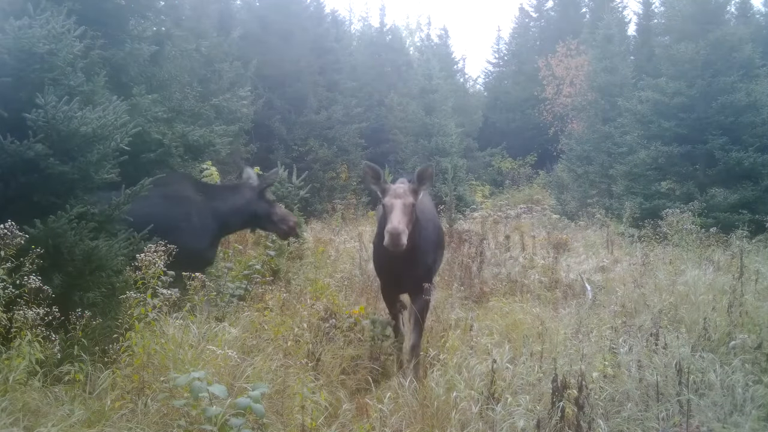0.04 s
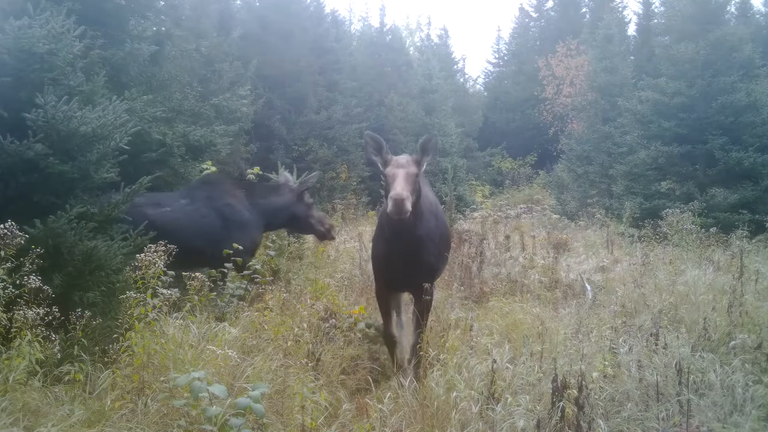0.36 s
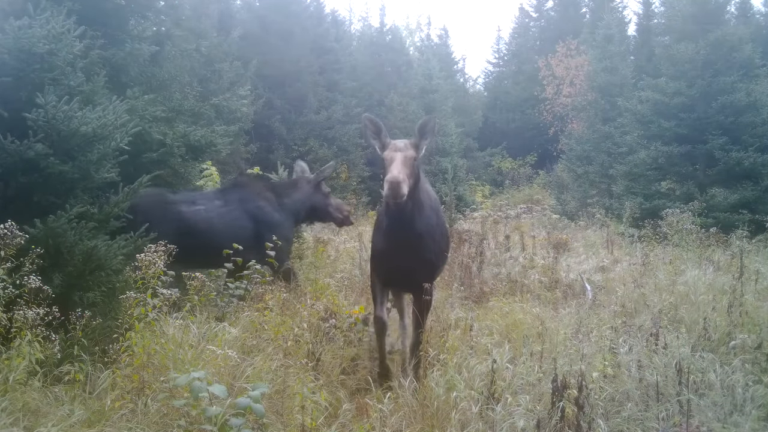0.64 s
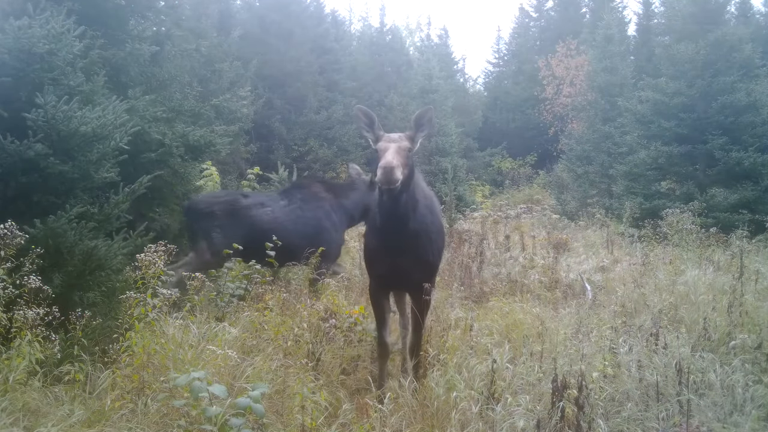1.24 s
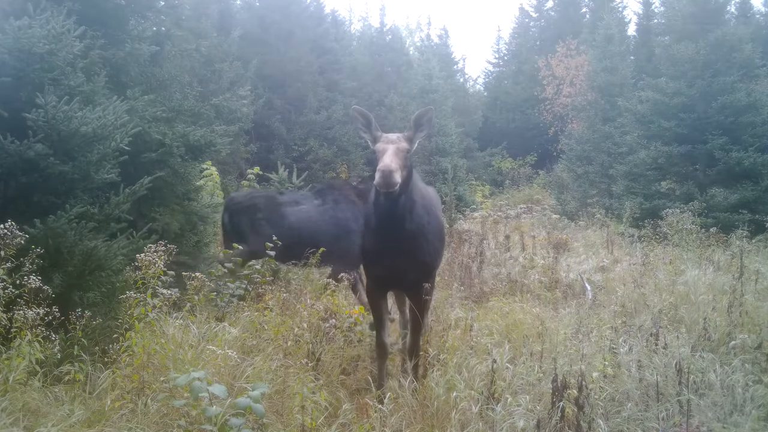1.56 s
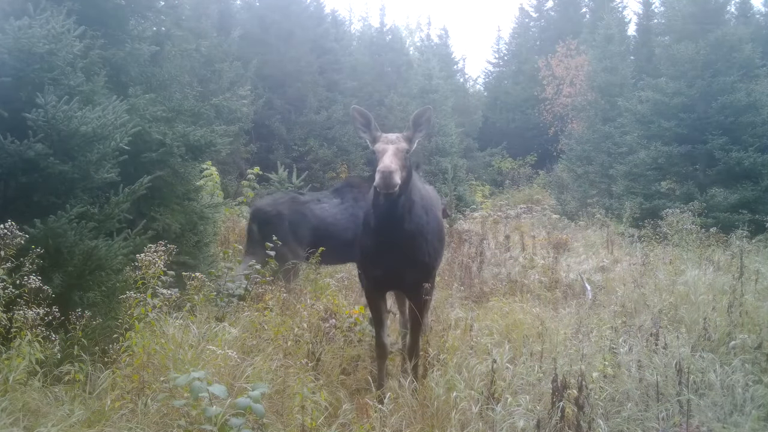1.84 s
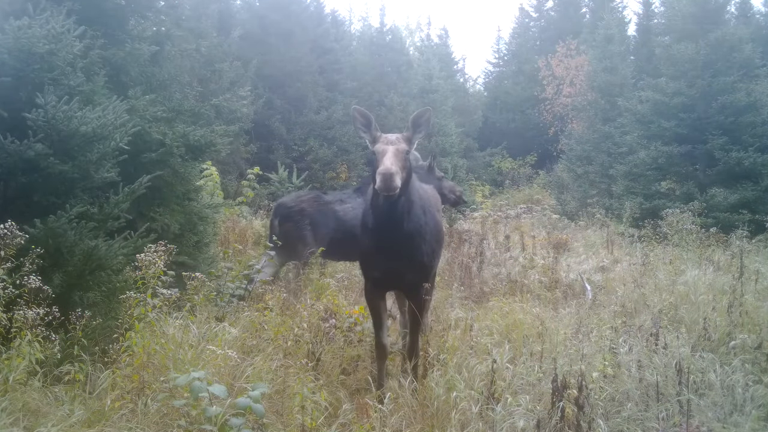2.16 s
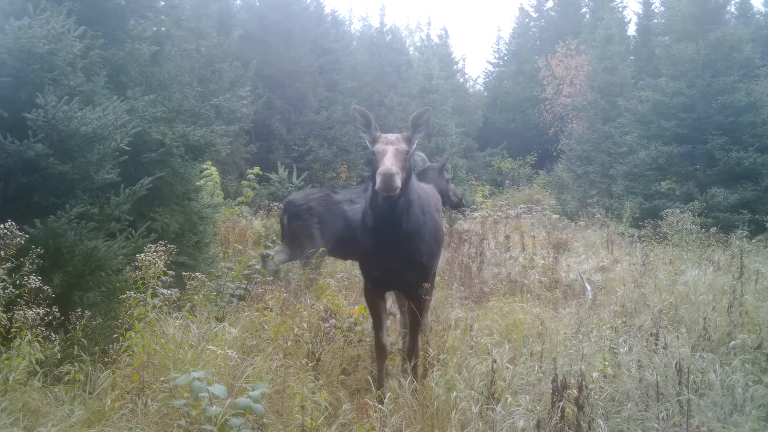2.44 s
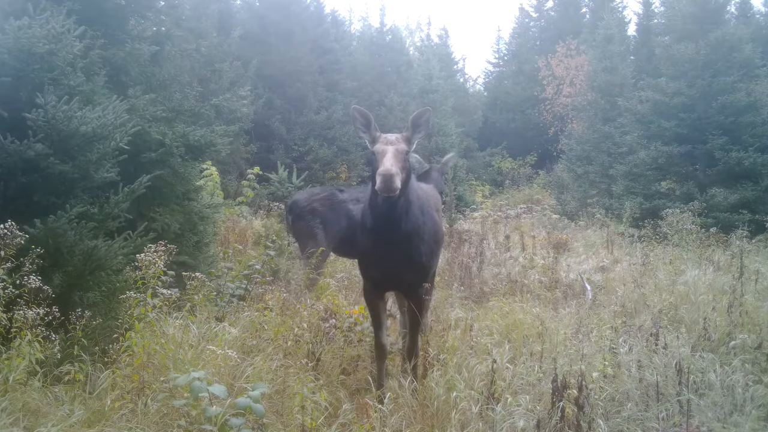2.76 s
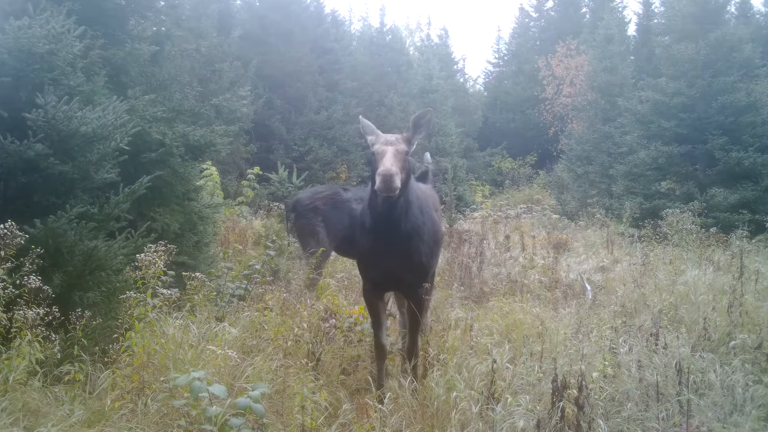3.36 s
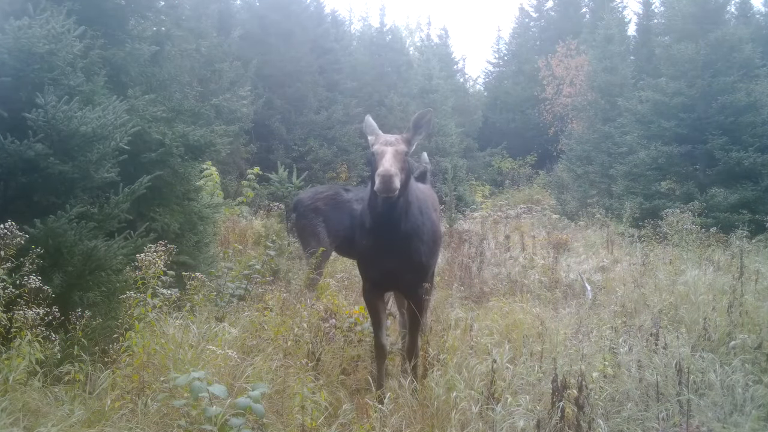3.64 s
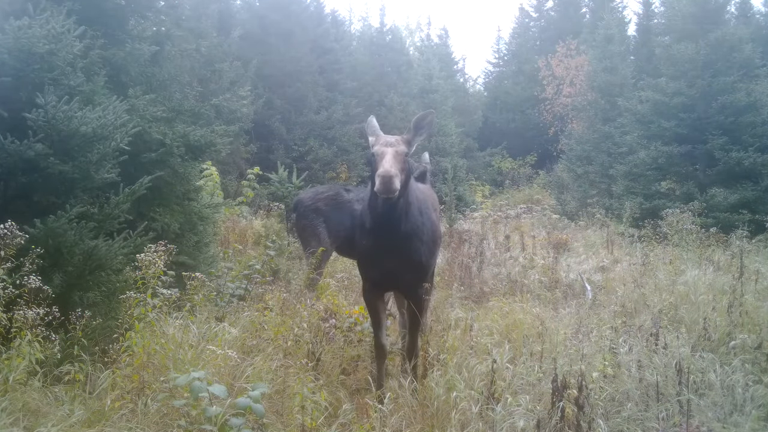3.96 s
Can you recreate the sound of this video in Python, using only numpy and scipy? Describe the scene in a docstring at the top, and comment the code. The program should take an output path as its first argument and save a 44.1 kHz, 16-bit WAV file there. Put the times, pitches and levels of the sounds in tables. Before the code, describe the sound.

A moose rustles through dry brush, twigs snapping, then clucks and grunts as a bird chirps.

```python
"""Dry grass swishes and crackles, twigs snap and hooves thud: a bull moose walks through brush in a still
forest clearing. As he slows, a bird gives a run of two-voiced arched chirps. The moose clucks twice and
grunts once, the trees answer, and a small bird peeps far off.
Low air rumble and faint hiss lie underneath; the sound cuts in after a third of a second."""
import sys
import numpy as np
from scipy import signal
from scipy.fft import rfft, irfft, next_fast_len
from scipy.io import wavfile
from scipy.ndimage import map_coordinates

SR = 44100
rng = np.random.default_rng(int(sys.argv[2]) if len(sys.argv) > 2 else 0)


def store_wav(level_fs):
    """Save 16-bit WAV to argv[1]."""
    pcm = np.round(np.clip(np.atleast_2d(level_fs), -1, 1) * 32767)
    wavfile.write(sys.argv[1], SR, pcm.T.astype(np.int16))


N = 176400

# Tone colours of the bed and the rustle. Each row: frequency in Hz, relative level in dB.
AIR_SPECTRUM = [(12, -22), (20, 3.5), (40, -6), (46, -6.5), (59, -16.5), (91, -16), (172, -22),
                (300, -29.5), (390, -50), (660, -120)]
HISS_SPECTRUM = [(150, -41), (250, -4), (409, -1.5), (518, -4.5), (703, -5.5), (806, -7.5), (1390, -9),
                 (1910, -12), (2470, -9.5), (4540, -14), (5480, -13), (6380, -15), (10800, -15),
                 (13200, -18.5), (14400, -41)]
BRUSH_SPECTRUM = [(100, 3.5), (300, 0), (800, -10), (1600, -0.5), (3000, -3.5), (5200, -5.5), (7000, -2.5),
                  (10000, -6.5), (14000, -21)]
GRASS_SPECTRUM = [(300, -5), (1200, -13), (2500, -2), (4200, -3), (5300, -4), (7000, 0.5), (9500, -3),
                  (12000, -10.5), (14500, -23)]
STALK_SPECTRUM = [(60, -7), (150, 0), (400, 3), (900, -7.5), (1600, 1.5), (2800, -4), (5000, -22),
                  (12000, -47)]
# The body rubbing through shrubs. Each row: time in seconds, level in dB.
BRUSH_LEVELS = [(.33, -49), (.5, -51), (.8, -54), (1.05, -53), (1.13, -57), (1.42, -57), (1.6, -59.5),
                (1.9, -59.5), (2.1, -63.5), (2.35, -59.5), (2.6, -70.5), (3.2, -66.5), (4, -82)]
# Legs sweeping grass, hooves crushing stalks.
# Each row: peak time in seconds, half width in seconds, relative level in dB.
GRASS_SWISHES = [(.385, 0.045, -47.5), (.625, 0.047, -53), (.79, 0.12, -56), (1.0, 0.047, -54.5),
                 (1.2, 0.031, -58.5), (1.318, 0.018, -50.5), (1.43, 0.052, -54.5), (1.81, 0.047, -58),
                 (2.23, .05, -61.5), (2.77, 0.048, -58), (2.852, 0.023, -54.5)]
STALK_CRUNCHES = [(.435, 0.017, -55), (.588, 0.0074, -53), (.783, 0.0099, -51.5), (.828, 0.015, -48.5),
                  (.87, .008, -55), (1.06, 0.024, -53), (1.18, .02, -56.5), (1.322, 0.01, -51),
                  (1.49, .025, -57.5), (2.2, .06, -60)]
# Breaking twigs. Each row: start in seconds, relative level in dB, pitch in Hz.
TWIG_SNAPS = [(.431, -31.5, 3000), (0.8187, -28, 1700), (.878, -32, 6300), (.918, -28.5, 5500),
              (0.9493, -34, 3500), (1.009, -33, 3600), (1.075, -34.5, 2300), (1.399, -28.5, 4200),
              (1.5186, -31.5, 4200), (1.8105, -34, 7500), (1.8167, -26, 4500), (1.8848, -30, 4830),
              (1.9914, -34, 2970), (2.428, -33.5, 1740)]
# The echo among the trees. Each row: frequency in Hz, seconds to fade by 60 dB.
FOREST_DECAY = [(100, 0.34), (600, 0.72), (2500, 1), (6000, .6), (14000, 0.19)]
# Hooves on soft ground. Each row: peak time in seconds, half width in seconds, level in dB, pitch in Hz.
HOOF_THUDS = [(0.823, .016, -57, 380), (1.058, 0.022, -38, 57), (1.32, .02, -53, 400),
              (1.507, .018, -50, 60.3), (1.856, .025, -51, 60.1), (2.87, .009, -48.5, 90)]
# Chirp voices and far peeps. Each row: midpoint in seconds, length in seconds, middle pitch in Hz,
# level in dB, upward lean as a share of the pitch.
BIRD_CHIRPS = [(2.303, .036, 1880, -51, 0.0011), (2.415, 0.04, 2480, -47.5, -0.051),
               (2.414, .038, 4500, -55.5, 0), (2.523, .08, 2600, -50.5, .07), (2.529, .05, 4450, -56.5, 0),
               (2.665, 0.054, 2620, -53.5, 0.042), (2.647, 0.022, 4380, -58, 0.0025),
               (2.675, .024, 4100, -53, -0.023), (2.797, .074, 2460, -51.5, .09),
               (2.799, .032, 4130, -52, -0.002), (2.942, 0.072, 2540, -54, .02),
               (2.93, .034, 4000, -58.5, 0.0025), (2.959, .026, 3680, -57.5, 0),
               (3.127, .046, 2500, -45.5, -.04), (3.102, .034, 2080, -55, 0.138),
               (3.154, .034, 2020, -52, -.02)]
FAR_PEEPS = [(3.588, .035, 7800, -66.5, 0), (3.668, .03, 5800, -68, 0), (3.79, .055, 5600, -64, -0.029)]
# The run ends purer than it starts. Each row: time in seconds, octave overtone in dB.
OVERTONE_LEVELS = [(2.95, -15), (3.08, -32)]
# The moose's clucks. Each row: start in seconds, relative level in dB, mouth resonance in Hz.
MOUTH_CLUCKS = [(2.855, -36.5, 501), (3.006, -40.5, 611)]
# The ring of the mouth. Each row: multiple of its resonance, gain in dB, seconds to fade by 60 dB.
MOUTH_MODES = [(.55, -10.5, 0.04), (.96, 0, 0.055), (1.2, -3.5, 0.053), (1.55, -16, .03), (2.08, -4, 0.042),
               (4.15, -8, .03), (5.05, -21, .03)]
# The shape of the grunt. Each row: time in seconds, relative level in dB, chest resonance in Hz,
# mouth resonance in Hz, mouth gain in dB.
GRUNT_SHAPE = [(3.01, -55, 199.7, 616, -1), (3.04, -56, 200, 620, -10), (3.065, -51.5, 201, 635, -8),
               (3.085, -48.5, 202, 702, -6.5), (3.103, -44.5, 191, 826, -1.5), (3.12, -46, 134.5, 920, -10),
               (3.145, -50.5, 115.5, 945, -15), (3.185, -64, 105, 945, -10)]
# The throat slackens. Each row: time in seconds, pulses a second.
THROAT_PULSE_RATES = [(3.095, 67), (3.12, 58.5)]
# Steady throat resonances. Each row: centre in Hz, width in Hz, gain in dB.
THROAT_FORMANTS = [(616, 51, -7), (1228, 110, -14), (1553, 100, -18.5)]


def amp(db):
    """Decibels to gain."""
    return 10 ** (np.asarray(db) / 20)


def unit(x):
    """Scale to rms 1."""
    return x / np.sqrt(np.mean(x ** 2) + 1e-20)


def clock():
    """The time of each sample in seconds."""
    return np.arange(N) / SR


def phase(hz):
    """The running phase of a moving pitch, in radians."""
    return 2 * np.pi * np.cumsum(hz) / SR


def along(points, hz):
    """Read a curve of (Hz, value) points on a log frequency axis."""
    knots_hz, values = np.transpose(points)
    return np.interp(np.log(hz + 1), np.log(knots_hz + 1), values)


def wobble(rate):
    """A smooth random curve, rate knots a second."""
    return map_coordinates(rng.standard_normal(8192), [clock() * rate], mode="wrap")


def butter(x, hz, kind="low"):
    """A gentle low, high or band pass."""
    return signal.lfilter(*signal.butter(2, hz, kind, fs=SR), x)


def filtered(x, response):
    """Equalise x with a gain that depends on frequency."""
    size = next_fast_len(N + SR // 2)
    return irfft(rfft(x, size) * response(np.fft.rfftfreq(size, 1 / SR)), size)[:N]


def coloured(x, spectrum):
    """Give x a tone colour, at rms 1."""
    return unit(filtered(x, lambda hz: amp(along(spectrum, hz))))


def resonance(x, hz, width_hz):
    """x through a steep resonance whose centre may move, at rms 1."""
    turn = np.exp(1j * phase(hz * np.ones(N)))
    return unit((turn * butter(x / turn, width_hz / 2)).real)


def air_bed():
    """Slow air rumbles on the microphone under an even hiss."""
    rumble = amp(-49.5 + 1.35 * wobble(8)) * coloured(rng.standard_normal(N), AIR_SPECTRUM)
    return rumble + amp(-59.5) * coloured(rng.standard_normal(N), HISS_SPECTRUM)


def crackle(spectrum, rate, spread_db, rub, contact_s=.0005):
    """Tiny scraping stem contacts of uneven size over a smooth rub, at rms 1."""
    sizes = amp(spread_db * np.minimum(rng.exponential(size=N), 4))
    power = sizes ** 2 * (rng.random(N) < rate / SR)
    envelope = np.sqrt(signal.lfilter([1], [1, -np.exp(-1 / (contact_s * SR))], power))
    scrapes = unit(envelope * rng.standard_normal(N))
    return coloured(scrapes + rub * rng.standard_normal(N), spectrum)


def swells(rows):
    """Bell-shaped swells, summed in power."""
    bells = (amp(db) * np.exp(-.5 * ((clock() - peak) / half) ** 2) for peak, half, db in rows)
    return np.sqrt(sum(bell ** 2 for bell in bells))


def rustle():
    """The body brushes the shrubs, the legs sweep the grass and the hooves crush stalks."""
    brush = amp(np.interp(clock(), *np.transpose(BRUSH_LEVELS)) + .66 * wobble(35))
    brush *= crackle(BRUSH_SPECTRUM, rate=900, spread_db=3.2, rub=1.03)
    grass = swells(GRASS_SWISHES) * amp(.65 * wobble(45))
    grass *= crackle(GRASS_SPECTRUM, rate=1800, spread_db=2.5, rub=1.05)
    stalks = amp(-1) * swells(STALK_CRUNCHES) * crackle(STALK_SPECTRUM, rate=500, spread_db=3, rub=.5)
    return brush + grass + stalks


def twigs(ring_cycles=5, splinter_s=.025):
    """A sharp crack, then a brief splintering; thin wood gives no bass."""
    out, t = np.zeros(N + SR), np.arange(SR // 10) / SR
    for start, db, hz in TWIG_SNAPS:
        ring = np.sin(2 * np.pi * hz * t) * amp(-60 * t * hz / ring_cycles)
        crack = butter(ring, hz * .54, "high")
        splinters = unit(butter(rng.standard_normal(len(t)), [hz * .51, hz * 2.05], "band"))
        splinters *= amp(-13.5 - 60 * t / splinter_s)
        out[round(start * SR):][:len(t)] += amp(db) * (1.21 * crack + splinters)
    return butter(out[:N], 10000)  # soften the top edge


def forest_echo(x, build_s=.027):
    """Scattered echoes from the trees build up, then die away, the bass and top first."""
    hz, t, noise = signal.stft(rng.standard_normal(SR), SR, nperseg=256)
    decay = amp(-60 * t / along(FOREST_DECAY, hz)[:, None])
    tail = signal.istft(noise * decay * (1 - np.exp(-t / build_s)), SR, nperseg=256)[1]
    return signal.fftconvolve(x, tail / np.linalg.norm(tail))[:N]


def hooves(pitch_scatter=.18):
    """Each heavy step gives a short dull boom in the ground, of no steady pitch."""
    out = np.zeros(N)
    for peak, half, db, hz in HOOF_THUDS:
        boom = np.sqrt(2) * np.sin(phase(hz * (1 + pitch_scatter * wobble(hz))))
        out += swells([(peak, half, db)]) * boom
    return out


def birdsong(notes, jitter=.018, rasp_depth=.33, rasp_hz=600):
    """Raspy whistles rise and fall in an arch; the main low voice bends less and carries an octave."""
    out = np.zeros(N + SR)
    for middle, length, hz, db, lean in notes:
        u = np.linspace(-1, 1, int(length * SR))  # position within the note
        waver, flutter = [map_coordinates(knots, [(u + 1) * length * 250], mode="wrap")
                          for knots in rng.standard_normal((2, 64))]
        low_voice = 2000 < hz < 3200
        droop = .16 if low_voice else .2
        tone = np.exp(1j * phase(hz * (1 + lean * u - droop * u ** 2 + jitter * waver)))
        octave = low_voice * amp(np.interp(middle, *np.transpose(OVERTONE_LEVELS))) * tone ** 2
        noise = unit(butter(rng.standard_normal((2, SR // 2)), rasp_hz))[:, :len(u)]
        rasp = 1 + rasp_depth * (noise[0] + 1j * noise[1]) / np.sqrt(2)  # shakes level and phase
        envelope = amp(db + 1.7 * flutter) * np.abs(1 - u ** 2) ** .68
        out[round((middle - length / 2) * SR):][:len(u)] += envelope * ((tone + octave) * rasp).imag
    return out[:N]


def clucks(attack_s=.0021, smack_s=.045):
    """The moose's mouth pops open and its cavity rings briefly."""
    out, t = np.zeros(N + SR), np.arange(SR // 5) / SR
    for start, db, hz in MOUTH_CLUCKS:
        ring = sum(amp(mode_db - 60 * t / t60) * np.sin(2 * np.pi * (ratio * hz * t + rng.random()))
                   for ratio, mode_db, t60 in MOUTH_MODES)
        smack = unit(butter(rng.standard_normal(len(t)), [150, 2500], "band"))
        smack *= amp(-5 - 60 * t / smack_s)
        out[round(start * SR):][:len(t)] += amp(db) * (ring + smack) * (1 - np.exp(-t / attack_s))
    return out[:N]


def grunt(roughness=.35):
    """Slow rough throat pulses over a falling chest tone; the opening mouth's resonance climbs."""
    t = clock()
    times, *columns = np.transpose(GRUNT_SHAPE)
    level_db, chest_hz, mouth_hz, mouth_db = [np.interp(t, times, column) for column in columns]
    pulse_hz = np.interp(t, *np.transpose(THROAT_PULSE_RATES)) * (1 + .03 * wobble(60))
    cycles = np.cumsum(pulse_hz) / SR
    pulses = unit(np.diff(np.floor(cycles), prepend=0))
    puffs = unit(rng.standard_normal(N) * np.exp(-3 * (cycles % 1)))
    source = pulses + roughness * puffs
    voice = amp(-3) * np.sqrt(2) * np.sin(phase(chest_hz))  # the clean chest tone
    voice += resonance(source, chest_hz, width_hz=75)
    voice += amp(mouth_db) * resonance(source, mouth_hz, width_hz=80)
    voice += amp(-5) * resonance(source, 3 * chest_hz, width_hz=80)  # the airway's next resonance
    voice += sum(amp(db) * resonance(source, hz, width) for hz, width, db in THROAT_FORMANTS)
    return voice * amp(level_db - 1.5) * (t > times[0]) * (t < times[-1])


def scene():
    """The mono mix: snaps, birds and moose calls echo in the trees; the rest stays dry."""
    snaps = twigs()
    birds = birdsong(BIRD_CHIRPS) + birdsong(FAR_PEEPS)
    moose = clucks() + grunt()
    echo = amp(-14) * forest_echo(snaps) + amp(-13) * forest_echo(birds) + amp(-9.5) * forest_echo(moose)
    return (rustle() + hooves() + snaps + birds + moose + echo + air_bed())[None]


def record(dry):
    """The sound cuts in abruptly, and a steep low pass takes off the highest treble."""
    start_s, top_hz = .331, 14300
    gated = dry[0] * (clock() > start_s)
    return filtered(gated, lambda hz: 1 / np.sqrt(1 + (hz / top_hz) ** 160))[None]


dry = scene()
out = record(dry)
store_wav(out)
```